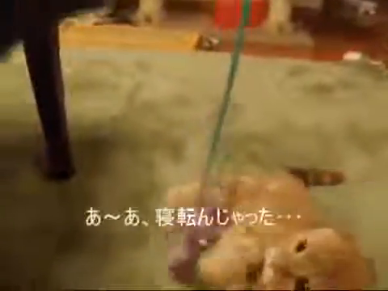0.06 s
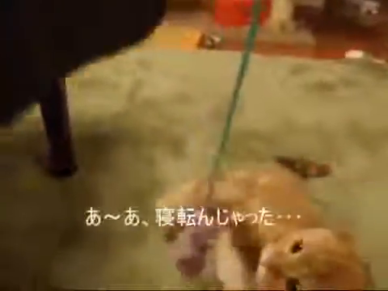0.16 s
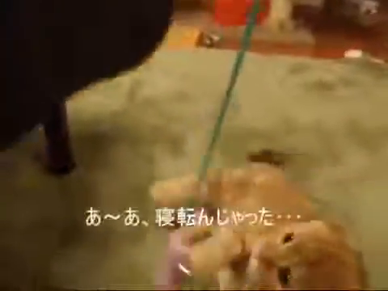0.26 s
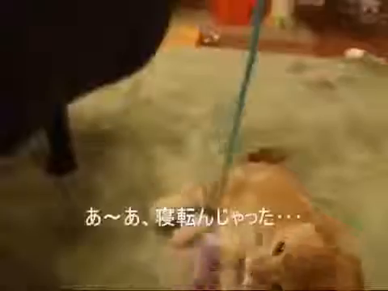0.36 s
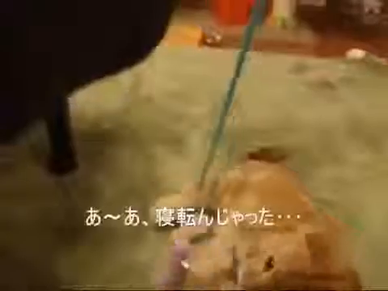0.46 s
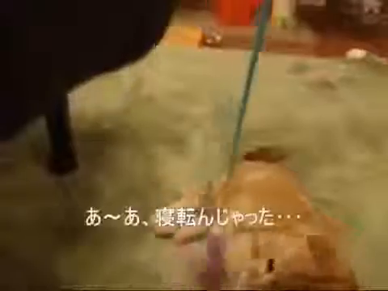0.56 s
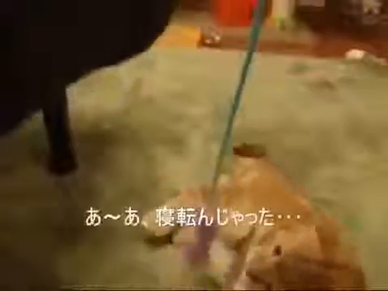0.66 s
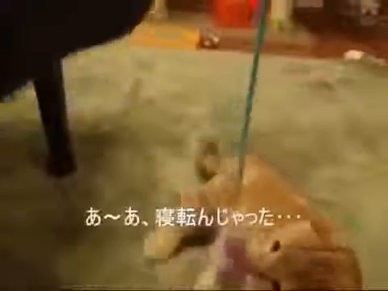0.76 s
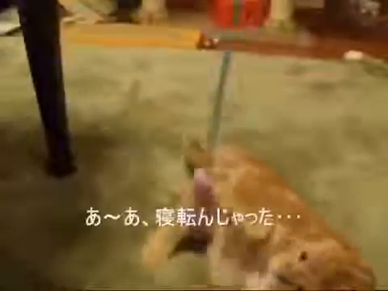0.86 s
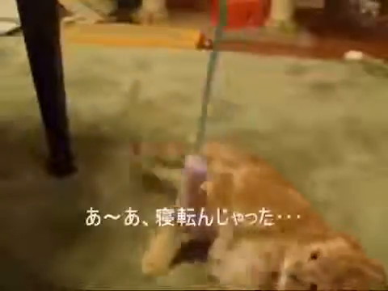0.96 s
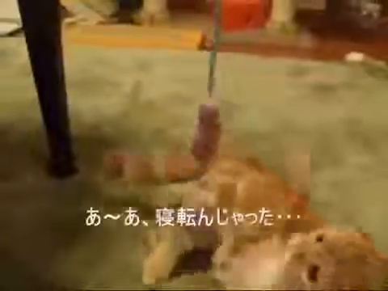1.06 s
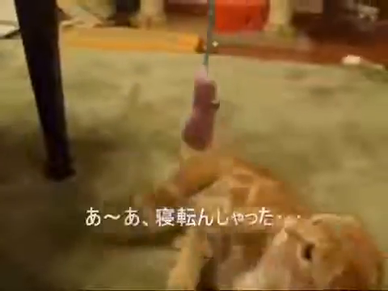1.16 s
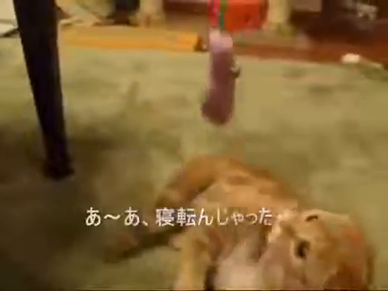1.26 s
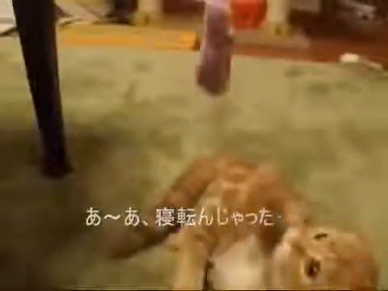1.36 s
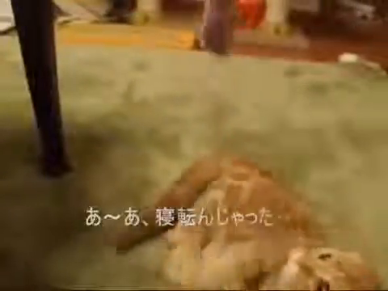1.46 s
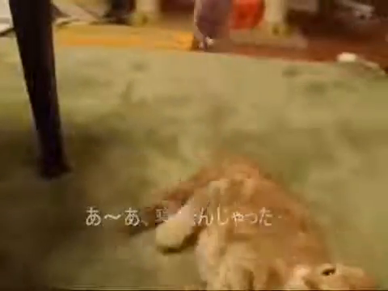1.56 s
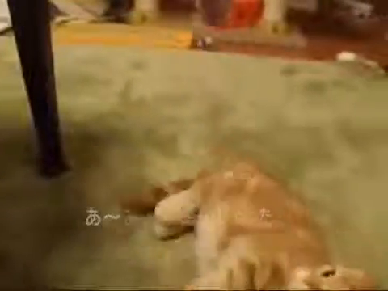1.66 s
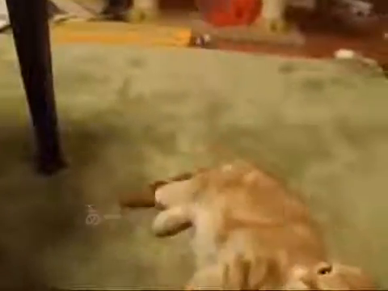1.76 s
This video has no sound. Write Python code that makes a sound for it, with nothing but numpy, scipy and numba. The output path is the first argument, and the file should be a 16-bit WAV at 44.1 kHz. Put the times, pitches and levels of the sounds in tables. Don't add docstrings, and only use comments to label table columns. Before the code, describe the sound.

Tiny jingle bell on a cat teaser toy rattles in quick irregular bursts in a quiet room

```python
import sys
import numpy as np
from scipy import signal
from scipy.fft import rfft, irfft
from scipy.io import wavfile
from scipy.ndimage import uniform_filter1d, map_coordinates
from numba import njit

SR = 44100
rng = np.random.default_rng(int(sys.argv[2]) if len(sys.argv) > 2 else 0)


def decibels_to_gain(level_db):
    exponent = np.asarray(level_db, float) / 20
    return 10 ** exponent


def inscribe(sig):
    pcm = np.round(np.clip(np.atleast_2d(sig).T, -1, 1) * 32767)
    wavfile.write(sys.argv[1], SR, pcm.astype(np.int16))


N = 79380
GUARD_HZ = 8504


def walk(rate_hz):
    hold = int(SR / rate_hz)
    steps = np.repeat(rng.standard_normal(N // hold + 1), hold)
    return 1.4 * uniform_filter1d(uniform_filter1d(steps, hold), hold)[:N]


def room():
    # (frequency [Hz], density [dB per Hz])
    hiss_shape = [(15, -44), (25, -6), (86, -3.5), (173, -8), (345, -6), (482, -11), (627, -10),
                  (1310, -11.5), (7500, -13.5), (9750, -42), (16500, -120)]
    # (time [s], level [dB])
    hiss_rise = [(.1, -0.5), (1.0, -2.5), (1.5, -0.1), (1.75, 0.7)]
    # (frequency [Hz], level [dB rms])
    whines = [(7677, -71), (7709, -73), (1292, -79)]
    hiss_db, hiss_walk_db, whine_walk_db = -50.5, -0.99, 6.1

    f_hz, t_s = np.arange(N // 2 + 1) * SR / N, np.arange(N) / SR
    shape_hz, shape_db = np.array(hiss_shape).T
    density_db = np.interp(np.log(np.clip(f_hz, 1, 7000)), np.log(shape_hz), shape_db)
    spectrum = decibels_to_gain(density_db) * (f_hz < GUARD_HZ)
    gain_db = hiss_walk_db * walk(5.77) + np.interp(t_s, *np.array(hiss_rise).T)
    hiss = irfft(rfft(rng.standard_normal(N)) * spectrum, N) * decibels_to_gain(gain_db)
    whine = 0
    for hz, db in whines:
        whine = whine + np.sqrt(2) * decibels_to_gain(db + whine_walk_db * walk(25)) * np.sin(2 * np.pi * hz * t_s)
    return hiss * decibels_to_gain(hiss_db) / np.std(hiss) + whine


def pellet():
    # (time [s], first strike level [dB], time until the pellet lands [s])
    tugs = [(.001, -41, 0.0074), (.011, -43, 0.015), (.036, -28.5, 0.0071), (.134, -34.5, 0.0034),
            (.15, -45, .006), (.158, -43, 0.0064), (.175, -37, 0.02), (.188, -30.5, 0.032),
            (.212, -29, .007), (.22, -25, .013), (.247, -35, 0.03), (.264, -27, 0.0052), (.269, -28, .007),
            (.298, -25, 0.0098), (.303, -19, 0.01), (.316, -26, 0.019), (.333, -10, .0055),
            (.3375, -19, .006), (.344, -18, .02), (.367, -40, 0.021), (.389, -29.5, 0.027),
            (.422, -30, .008), (.437, -33.5, 0.0047), (.445, -19, 0.019), (.468, -39, .005),
            (.477, -33.5, .025)]
    # (time [s], first strike level [dB], time until the pellet lands [s])
    swats = [(.572, -29.5, 0.0083), (.582, -28, .004), (.586, -24, .02), (.625, -37, .014),
             (.644, -30, 0.023), (0.663, -26, .02), (.693, -28, 0.008), (.705, -21, .008),
             (.721, -36.5, 0.013), (.741, -31, 0.051), (.763, -21, .006), (.77, -22, .016),
             (.793, -31.5, 0.028), (.812, -33, .02), (.834, -36, .013), (.86, -31.5, 0.015),
             (.875, -23.5, 0.0084), (.883, -17.5, 0.0044), (.891, -16.5, .012), (.916, -23.5, 0.02),
             (.944, -22, 0.012), (.967, -30, 0.0088)]
    # (time [s], first strike level [dB], time until the pellet lands [s])
    lifts = [(1.011, -30.5, 0.016), (1.022, -31, 0.011), (1.082, -34.5, .018), (1.102, -30, .014),
             (1.122, -27.5, .014), (1.138, -26, 0.0062), (1.149, -35.5, 0.012), (1.166, -27, .024),
             (1.193, -25.5, 0.0073), (1.206, -27, .014), (1.231, -38, 0.0099), (1.241, -35.5, 0.0041),
             (1.327, -35.5, 0.0056), (1.352, -41, 0.0046), (1.356, -31, .006), (1.365, -45, 0.0069),
             (1.375, -34, 0.0038), (1.417, -38, 0.0059), (1.43, -33.5, 0.0054)]
    gap_s, rebound_db, fade_db_per_s, scatter_db = .0045, -6, -300, 2.5

    rows = np.array(tugs + swats + lifts)
    start_s, first_db, flight_s = rows[:, :1], rows[:, 1:2], rows[:, 2:3]
    chance = np.clip(rng.standard_normal((len(rows), 10, 9)), -1.3, 1.3)
    late_s = np.cumsum(gap_s * np.exp(.4 * chance[:, :, 0]), axis=1)
    late_s -= late_s[:, :1]
    loss_db = rebound_db + fade_db_per_s * late_s + scatter_db * chance[:, :, 1]
    db = first_db + (late_s > 0) * loss_db
    mode_chance = chance[:, :, 2:] * np.where(late_s > 0, 1, .3)[:, :, None]

    free = np.zeros(N)
    for s, _, length_s in rows:
        free[int(s * SR):int((s + length_s) * SR)] = 1
    used = late_s < flight_s
    at = ((start_s + late_s) * SR).astype(int)
    return at[used], db[used], mode_chance[used], free


@njit
def ring(x, hz, t60_s):
    y, z = np.empty(len(x)), 0j
    for i in range(len(x)):
        z = z * np.exp(2j * np.pi * hz[i] / SR - np.log(1000) / (t60_s[i] * SR)) + x[i]
        y[i] = z.imag
    return y


def decay(t60_s):
    return np.exp(-np.log(1000) * np.arange(int(t60_s * SR)) / (t60_s * SR))


def bell():
    # (time [s], pitch [Hz])
    swing = [(.04, 7750), (.22, 7782), (.28, 7770), (.31, 7720), (.35, 7716), (.4, 7750), (.455, 7712),
             (.59, 7750), (.665, 7748), (.71, 7790), (.77, 7724), (.84, 7760), (.885, 7790), (.95, 7758),
             (1.12, 7792), (1.2, 7765), (1.36, 7800), (1.43, 7700)]
    # (ratio to the main mode [-], level [dB], scatter per strike [dB], free t60 [s])
    shell = [(1., 0, 1.5, .085), (1.017, -13, 4., .04), (1.027, -14, 4., .03), (.979, -19, 4., .03),
             (.955, -33, 3., .015)]
    bell_db, choked_t60_s, contact_s = 2.2, 0.013, .0022
    tick_db, tick_hz, tick_t60_s = -40, 7000, .008
    echo_db, echo_t60_s = -13, 0.6

    at, db, chance, free = pellet()
    free = uniform_filter1d(free, size=40)
    hz = np.interp(np.arange(N) / SR, *np.array(swing).T)
    push_s = np.arange(SR // 100) / SR
    window = np.sin(np.pi * np.clip(push_s / contact_s, 0, 1)) ** 2
    push = window * np.cos(2 * np.pi * hz.mean() * push_s) * 4 / (contact_s * SR)
    modes = 0
    for k, (ratio, mode_db, scatter_db, t60_s) in enumerate(shell):
        force = np.full(N, 1e-18)
        force[at] = decibels_to_gain(db + mode_db + scatter_db * chance[:, k])
        force = signal.fftconvolve(force, push)[:N]
        modes = modes + ring(force, hz * ratio, choked_t60_s + free * (t60_s - choked_t60_s))

    hits = np.zeros(N)
    hits[at] = decibels_to_gain(db)
    highpass = signal.butter(2, tick_hz, "high", fs=SR, output="sos")
    grit = signal.sosfilt(highpass, rng.standard_normal(N))
    tick = decibels_to_gain(tick_db) * grit * np.convolve(hits, decay(tick_t60_s))[:N]

    tail = rng.standard_normal(SR)[:int(echo_t60_s * SR)] * decay(echo_t60_s)
    echo = signal.fftconvolve(modes, tail / np.sqrt(np.sum(tail ** 2)))[:N]
    return decibels_to_gain(bell_db) * (modes + tick + decibels_to_gain(echo_db) * echo)


def rod():
    # (time [s], pitch [Hz], level [dB])
    strokes = [
        [(.478, 250, -56), (.486, 285, -49), (.505, 355, -48), (.522, 355, -47), (.538, 305, -49),
         (.548, 290, -64)],
        [(.692, 385, -62), (.701, 365, -45.5), (.72, 320, -43), (.732, 255, -49), (.742, 210, -62)],
    ]
    t_s, out = np.arange(N) / SR, 0
    for stroke in strokes:
        s, hz, db = np.array(stroke).T
        pitch_hz = np.interp(t_s, s, hz) * (1 + 0.021 * walk(150))
        phase = 2 * np.pi * np.cumsum(pitch_hz) / SR
        level_db = np.interp(t_s, s, db, -150, -150) + 1.2 * walk(120.2)
        out = out + np.sqrt(2) * decibels_to_gain(level_db) * np.sin(phase)
    return out


def scene():
    return (bell() + rod() + room())[None]


def band_limit(x):
    return signal.sosfilt(signal.butter(12, 16130, fs=SR, output="sos"), x)


def record(dry):
    camera_hz, top_hz, dc_offset = 16000.12, 14820, -.0032
    guarded = signal.sosfilt(signal.butter(8, GUARD_HZ, fs=SR, output="sos"), dry[0])
    held_at = np.floor(np.arange(N) * camera_hz / SR) * SR / camera_hz
    held = map_coordinates(guarded, [held_at], order=5, mode="mirror")
    top_cut = signal.ellip(7, .1, 40, top_hz, fs=SR, output="sos")
    mix = signal.sosfiltfilt(top_cut, held) + dc_offset
    return band_limit(mix[None])


dry = scene()
out = record(dry)
inscribe(out)
```